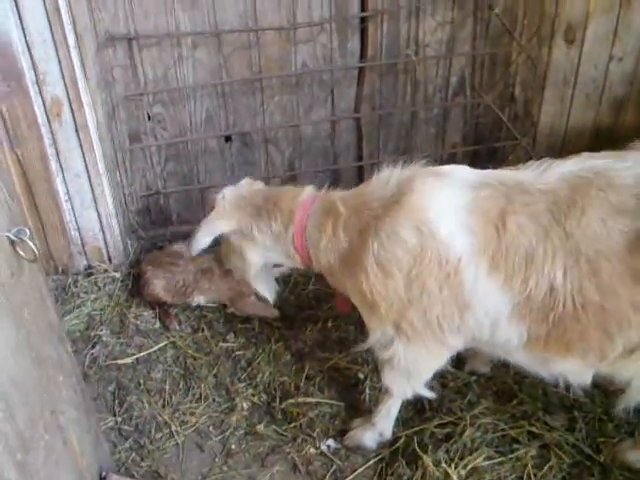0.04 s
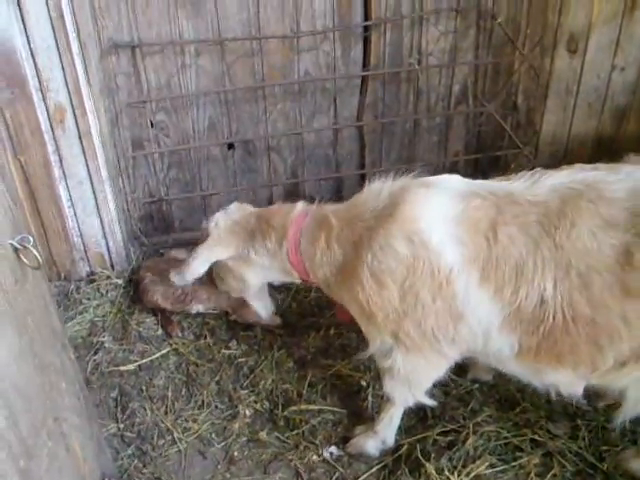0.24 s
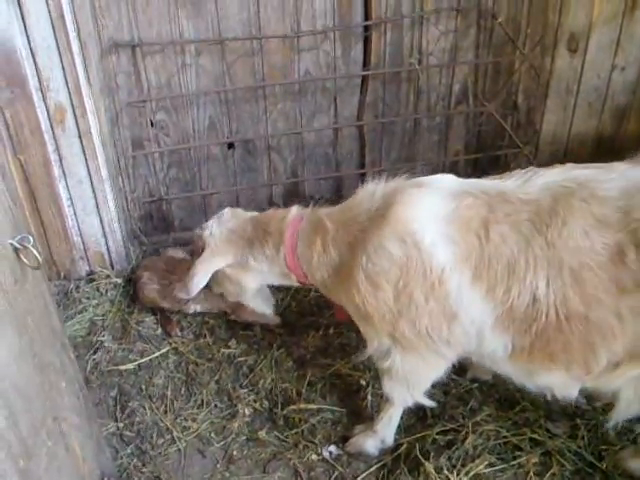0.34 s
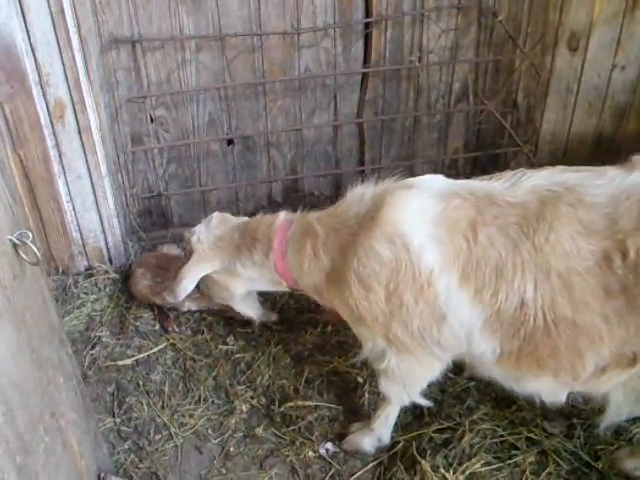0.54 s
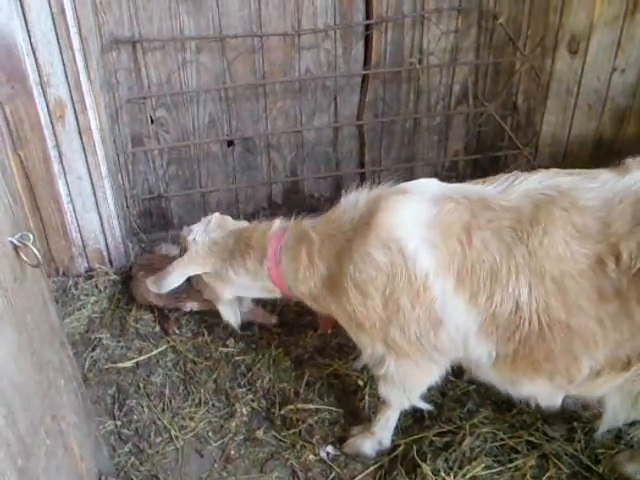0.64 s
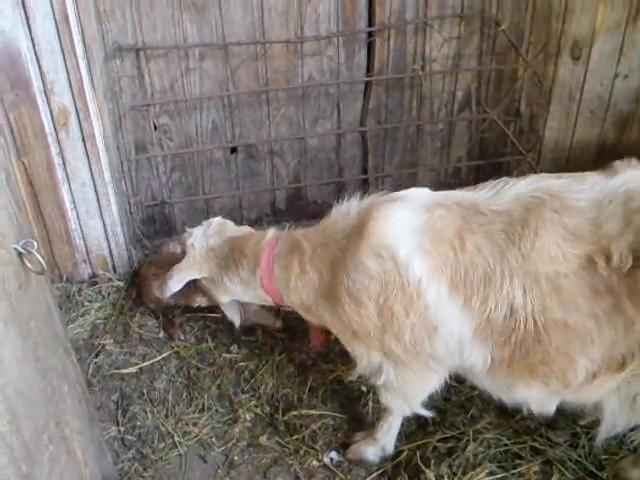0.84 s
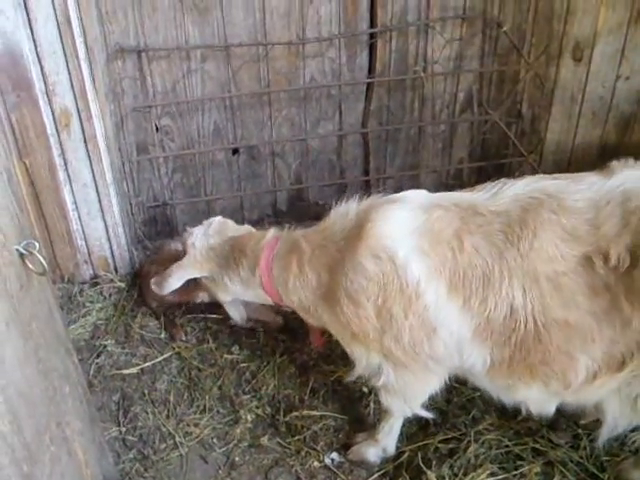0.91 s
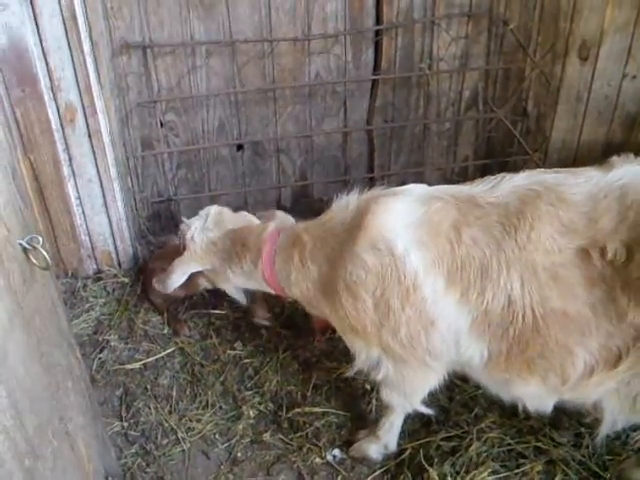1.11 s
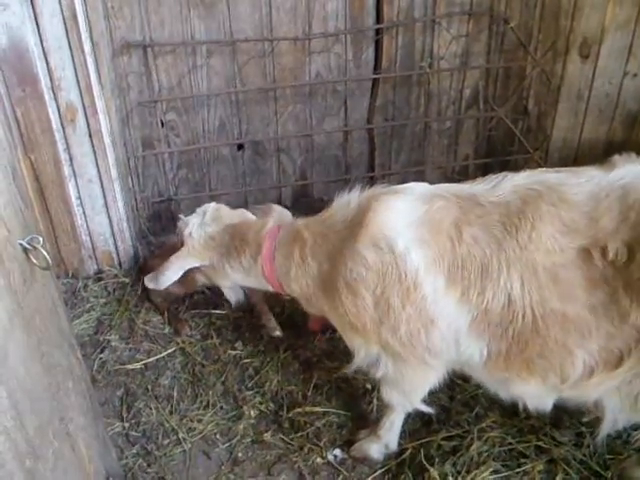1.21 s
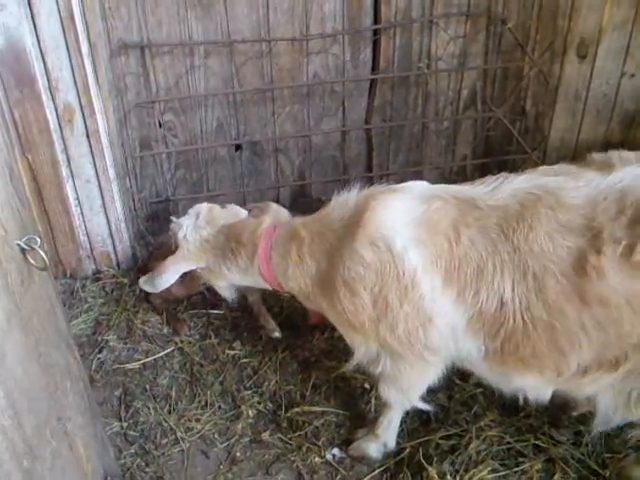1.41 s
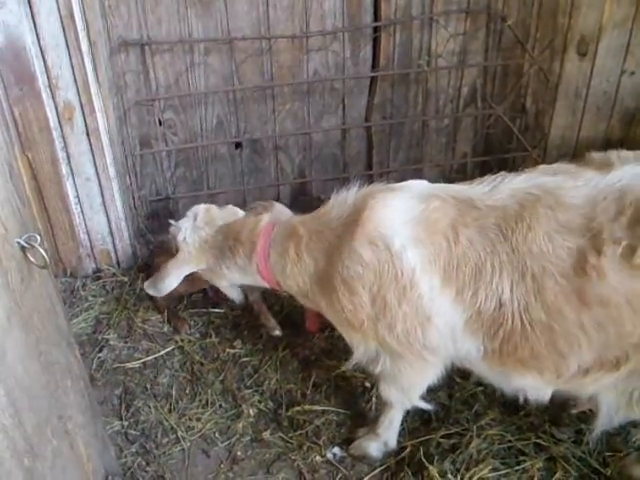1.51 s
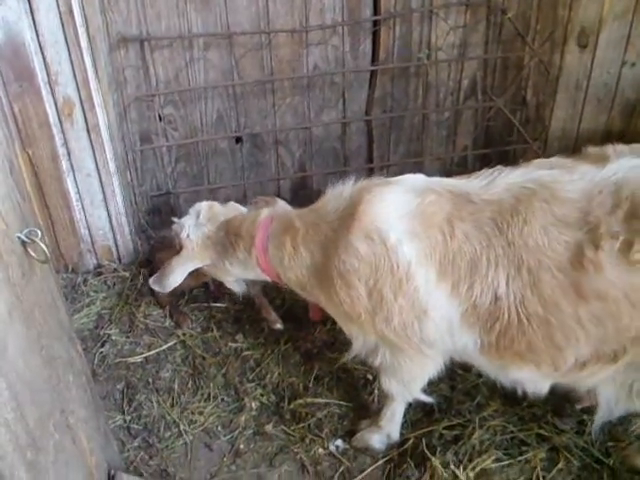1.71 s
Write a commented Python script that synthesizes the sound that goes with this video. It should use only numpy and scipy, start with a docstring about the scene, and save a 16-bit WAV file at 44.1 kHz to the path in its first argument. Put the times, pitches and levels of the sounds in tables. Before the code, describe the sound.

A doe bleats once, loud and raspy-edged, after barely heard low grunts. The boards echo briefly, then soft closed-mouth throbbing grunts follow and a tiny straw snap, over faint low air noise; near, plain microphone.

```python
"""In a wooden barn stall low, throbbing grunts come first, as a doe makes to her kid: slack-fold pulses
ring a throat behind a nearly closed mouth. Then one loud, high goat bleat starts hoarse, holds a clear
note and breaks up as the pitch drops: fold harmonics and pulsed noise, the harmonics through a moving throat.
The boards ring briefly as dense, decaying echoes. More grunts follow, then a straw snaps as a noise burst.
Filtered noise and wavering sines lie underneath throughout as dull air and a faint hum."""
import sys
import numpy as np
from scipy import signal
from scipy.fft import rfft, irfft
from scipy.io import wavfile
from scipy.ndimage import uniform_filter1d

SR = 44100
rng = np.random.default_rng(int(sys.argv[2]) if len(sys.argv) > 2 else 0)


def persist_wave(psi):
    """Save psi, clipped to +-1, as 16-bit WAV."""
    counts = np.round(np.clip(psi, -1, 1) * 32767).astype(np.int16)
    wavfile.write(sys.argv[1], SR, np.atleast_2d(counts).T)


N = 77175  # samples, 1.75 s
T = np.arange(N) / SR  # time, s


def amp(db):
    """Level law: decibels to amplitude ratio."""
    return 10 ** (np.asarray(db) / 20)


def unit(x):
    """Power normalisation: scales to rms 1."""
    return x / np.sqrt(np.mean(x ** 2) + 1e-20)


def read(points, hz):
    """Spectral envelope: level in dB at any frequency, interpolated over log frequency."""
    f, value = np.transpose(points)
    return np.interp(np.log(hz + 1), np.log(f + 1), value)


def follow(table):
    """Control by linear interpolation: each column of a table, sample by sample."""
    s, *columns = np.transpose(table)
    return [np.interp(T, s, c) for c in columns]


def during(table):
    """Gating: open while a control table lasts, with edges smoothed over 200 samples."""
    is_open = (T > table[0][0]) & (T < table[-1][0])
    return uniform_filter1d(1. * is_open, size=200)


def wander(hz):
    """Low-pass random modulation: chance variation up to about the given rate, at rms 1."""
    spectrum = rfft(rng.standard_normal(N))
    lowpass = 1 / (1 + (np.fft.rfftfreq(N, 1 / SR) / hz) ** 4)
    return unit(irfft(spectrum * lowpass, N))


def colour(x, points):
    """Minimum-phase filtering: the given spectrum fixes the causal impulse response."""
    log_gain = np.log(amp(read(points, abs(np.fft.fftfreq(4096, 1 / SR)))))
    min_phase = np.exp(signal.hilbert(log_gain).conj())  # log gain and phase are a Hilbert pair
    taps = np.fft.ifft(min_phase).real[:2048]
    return signal.fftconvolve(x, taps)[:len(x)]


def puffs(turns, decay=0.69, steady=0.13):
    """Glottal noise modulation: air noise jumps up and dies away (decay in cycles) in every fold cycle."""
    opening = steady + np.exp(-(turns % 1) / decay)
    return opening * rng.standard_normal(len(turns))


def add(mix, s, sound):
    """Superposition: adds a sound into the mix from time s."""
    part = mix[max(round(s * SR), 0):][:len(sound)]
    part += sound[:len(part)]


# vibration rate of the folds: time_s, pitch_hz
FOLD_PITCH = [(.14, 378), (.19, 390), (.24, 394), (.268, 403), (.29, 400), (.312, 396), (.34, 406),
              (.385, 406.5), (.465, 409), (.515, 414), (.565, 415), (.59, 419), (.64, 420), (.68, 422.7),
              (.77, 423), (.793, 415), (.815, 409), (.84, 402), (.868, 390), (.89, 335), (.93, 300)]
# rms random deviation of that rate: time_s, jitter_share
FOLD_JITTER = [(.17, .022), (.23, .012), (.26, .004), (.31, .002), (.36, .0007), (.46, .0005),
               (.485, .0028), (.515, .001), (.545, .0022), (.57, .001), (.6, .0025), (.63, .0006),
               (.77, .0006), (.795, .003), (.83, .003), (.86, .008), (.885, .035), (.93, .06)]
# low resonance, bright ring and treble: time_s, low_db, ring_db, treble_db
BAND_LEVELS = [(.14, -62, -56, -64), (.184, -38, -39, -52), (.228, -34, -35, -44), (0.25, -17, -20, -29),
               (0.268, -10, -13, -24), (0.284, -12, -12, -23), (0.294, -24, -16, -27),
               (0.326, -21, -11, -23), (0.338, -11, -16, -26), (0.4, -16, -10, -23), (0.422, -16, -15, -26),
               (0.468, -14, -12, -23), (0.478, -12, -17, -26), (0.512, -11, -12, -24),
               (0.536, -21, -13, -25), (0.568, -14, -15, -26), (0.59, -19, -11, -23),
               (0.604, -12, -11, -22), (0.624, -14, -15, -27), (0.638, -13, -11, -23),
               (0.71, -14, -11, -23), (0.726, -16, -14, -25), (0.752, -11, -10, -22), (0.79, -15, -13, -24),
               (0.834, -14, -12, -24), (0.85, -27, -13, -23), (.872, -24, -20, -33), (.893, -33, -17, -37),
               (.912, -42, -24, -50), (.94, -60, -56, -75)]
# mouth opening, 0 narrow to 1 wide: time_s, opening_share
MOUTH_OPENING = [(.26, 0), (0.311, 0.25), (.36, 0.3), (.46, 0.68), (.52, 0.77), (.66, 1), (.77, 1),
                 (.815, 0.52), (.87, 0)]
# throat response with the mouth narrow, half open and wide: frequency_hz, gain_db
THROAT_NARROW = [(280, -50), (390, -24), (620, -20), (800, 0), (960, 6), (1190, -11), (1600, -25),
                 (2000, -14), (2400, -3), (2800, -17), (3200, -11), (3600, -11), (4000, -1), (4400, -12),
                 (4900, -27), (5900, -31), (6950, -19), (7700, -34), (8200, -45), (8650, -36), (9300, -58),
                 (11900, -47), (12600, -56), (13500, -41), (14500, -65)]
THROAT_HALF = [(407, -18), (814, 0), (1220, -10), (1630, -23), (2035, -14), (2440, -1), (2850, -12),
               (3260, -5), (3660, -7), (4070, -4), (4480, -13), (4900, -13), (5300, -23), (6100, -20),
               (6900, -17), (7730, -22), (8140, -34), (8550, -28), (9200, -58), (10100, -44), (12600, -48),
               (13450, -33), (14400, -60)]
THROAT_WIDE = [(420, -14), (840, 0), (1265, -7.5), (1690, -13), (2110, -10), (2530, -14), (2950, -4),
               (3380, -4), (3800, -4), (4220, -7), (4640, -13), (5060, -21), (5900, -30), (6750, -24),
               (7170, -20), (7600, -21), (8030, -25), (8450, -41), (9300, -52), (12600, -56), (13300, -44),
               (14400, -75)]
# hoarseness of the bleat: time_s, rasp_level_db
RASP_LEVEL = [(.13, -54), (.18, -39), (.215, -32), (.25, -27), (.28, -28), (.32, -36), (.39, -50),
              (.46, -50), (.49, -41), (.56, -44), (.6, -38), (.64, -52), (.77, -52), (.8, -34), (.84, -29),
              (.868, -22), (.895, -20), (.92, -30), (.96, -58)]
# rasp spectrum as the bleat opens and as it closes: frequency_hz, gain_db
RASP_OPENING = [(200, -23.5), (500, -14.5), (800, -16), (1400, -17), (1950, -7.5), (2400, -10.5),
                (2900, -10.5), (3600, -6.5), (4400, -0.5), (5200, -15), (6000, -20), (6800, -7),
                (7800, -24), (9300, -37), (13500, -44), (15000, -50)]
RASP_CLOSING = [(200, -43.5), (500, -26), (720, 9.5), (950, 13), (1200, 4.5), (1400, -11.5), (2000, 1),
                (2400, -22.5), (2700, -10), (3200, -4), (4200, -12.5), (5300, -17.5), (6800, -13),
                (7800, -14), (9300, -29), (13500, -21.5), (15000, -50.5)]
JITTER_HZ = 255.3  # rate limit of the pitch deviation
SWELL_DB, SWELL_HZ = 2.7, 14  # rms swell from the 5th harmonic up, its rate limit
FLUTTER, FLUTTER_HZ = .32, 48  # depth before harmonic and jitter weighting, its rate limit


def bleat(shimmer=5):
    """Source-filter principle: unsteady fold harmonics pass a moving throat; returns tone and pulsed rasp."""
    (pitch,), (mouth,), (rasp_db,), (jitter,) = map(
        follow, (FOLD_PITCH, MOUTH_OPENING, RASP_LEVEL, FOLD_JITTER))
    turns = np.cumsum(pitch * (1 + jitter * wander(JITTER_HZ))) / SR  # fold cycles so far
    k = np.arange(1, 37)[:, None]  # harmonic numbers
    hz = k * pitch

    # throat gain, crossfaded between three mouth shapes
    wide = np.clip(2 * mouth - 1, 0, 1)
    narrow = np.clip(1 - 2 * mouth, 0, 1)
    half = 1 - narrow - wide
    throat_db = narrow * read(THROAT_NARROW, hz) + wide * read(THROAT_WIDE, hz) + half * read(THROAT_HALF, hz)

    # upper harmonics swell slowly, each on its own
    swell_db = SWELL_DB * np.minimum(k / 5, 1) ** 2 * np.array([wander(SWELL_HZ) for _ in k])
    gain = amp(throat_db) * amp(swell_db)

    # faster flutter of amplitude and phase, deeper where the folds are unsteady
    depth = FLUTTER * np.minimum(k / 7, 1) ** 1.5 * np.minimum(np.sqrt(jitter / .001), 1.6)
    flutter = 1 + depth * np.array([wander(FLUTTER_HZ) + 1j * wander(FLUTTER_HZ) for _ in k])
    phase = 2 * np.pi * (k * turns + .55 * rng.random(k.shape))
    partials = gain * (flutter * np.exp(1j * phase)).real
    partials = partials / np.sqrt(1 + 2 * depth ** 2)  # flutter leaves the power unchanged

    # harmonics 1-2, 3-12 and 13-36, each group brought to its own level
    tone = 0
    for band, level_db in zip((slice(0, 2), slice(2, 12), slice(12, None)), follow(BAND_LEVELS)):
        expected_rms = np.sqrt((gain[band] ** 2).sum(0) / 2)
        tone = tone + amp(level_db) * partials[band].sum(0) / expected_rms
    tone = tone * (1 + shimmer * jitter * wander(JITTER_HZ / 2))

    # the rasp spectrum changes mostly near the end
    start_s, end_s = FOLD_PITCH[0][0], FOLD_PITCH[-1][0]
    closing = np.clip((T - start_s) / (end_s - start_s), 0, 1) ** 6
    air = puffs(turns)
    rasp = (1 - closing) * unit(colour(air, RASP_OPENING)) + closing * unit(colour(air, RASP_CLOSING))
    return tone * during(BAND_LEVELS), rasp * amp(rasp_db) * during(RASP_LEVEL)


# grunts: start_s, length_s, pulse_rate_hz, throat_level_db, chest_level_db, hiss_level_db
GRUNT_CALLS = [(.026, 0.033, 111, -41, -53, -61), (0.051, 0.052, 189, -36.5, -33.5, -48),
               (.096, .055, 110, -45.5, -57, -51.5), (1.151, .028, 168.8, -47, -46, -67),
               (1.18, 0.054, 64.1, -45, -58.5, -62), (1.24, .025, 69.6, -48, -52, -69),
               (1.269, 0.026, 147.9, -39.5, -56, -60), (1.282, 0.032, 207, -40.5, -43, -48),
               (1.319, 0.045, 130, -36, -41, -47), (1.341, 0.057, 221.3, -29.5, -29, -41.5),
               (1.432, 0.027, 194.3, -38.5, -44, -53.5), (1.449, 0.046, 215.9, -27.5, -29, -45.5),
               (1.49, 0.024, 198.7, -41, -57, -49.5), (1.553, 0.06, 79.75, -34, -41, -50.5),
               (1.602, 0.021, 78.3, -37, -46.5, -52)]
# throat behind the nearly closed mouth: frequency_hz, gain_db
CLOSED_THROAT = [(100, -44.5), (300, -19.5), (480, -22), (600, 0), (720, 7.5), (790, 4.5), (875, 8),
                 (1060, 6), (1220, -12.5), (1450, -19.5), (1620, -11), (1900, -42), (2400, -16),
                 (3000, -40), (4500, -53), (9000, -78)]
# hiss through the nose: frequency_hz, gain_db
NOSE_HISS = [(300, -21), (1400, 4.5), (2000, 0), (2450, 9.5), (3100, -7.5), (4100, 0), (4700, -2),
             (5500, -24.5), (6800, -5), (7800, -25), (8700, -12.5), (9400, -26.5), (13500, -20),
             (15000, -45)]
GRUNT_RISE_S, GRUNT_FALL_S = 0.026, .012  # times for a full 0-1 ramp
GRUNT_JITTER, GRUNT_PUFF = .02, .25  # pulse-rate scatter share, air mixed with the knocks


def grunt(length, rate_hz, throat_db, chest_db, hiss_db, onset=0.61):
    """Impulse excitation: slack folds knock the throat and a chest tone into ringing, with pulsed hiss."""
    t = np.arange(0, length + .03, 1 / SR)  # room to ring out
    turns = np.cumsum(rate_hz * (1 + GRUNT_JITTER * wander(71)[:len(t)])) / SR
    rise = np.clip(onset + t / GRUNT_RISE_S, 0, 1)  # begins part-way up, at onset
    swell = rise * np.clip((length - t) / GRUNT_FALL_S, 0, 1)
    knocks = unit(np.diff(np.floor(turns), prepend=-1))  # one impulse per cycle
    throat = colour(swell * (knocks + GRUNT_PUFF * unit(puffs(turns))), CLOSED_THROAT)
    chest = colour(swell * knocks, [(60, -27.5), (140, -16.5), (205, -4), (260, -9.5), (400, -38), (900, -58)])
    hiss = colour(swell * puffs(turns), NOSE_HISS)
    voice = amp(throat_db) * unit(throat) + amp(chest_db) * unit(chest) + amp(hiss_db) * unit(hiss)
    return np.sqrt(t[-1] / length) * voice  # levels refer to the length without the ring-out


# reverberation time of the boards: frequency_hz, t60_s
STALL_T60 = [(150, 0.13), (900, 0.3), (2500, 0.3), (5000, 0.18), (9000, 0.23), (14000, 0.073)]
BLEAT_ROOM_DB, RASP_ROOM_DB, GRUNT_ROOM_DB = -14, 0.5, -11  # sends to the stall; grunts and straw share one


def stall(x):
    """Reverberant decay: dense echoes off the boards, each frequency band dying at its own speed."""
    length = SR // 2
    signs = rng.choice([-1., 1.], length)
    echoes = signs * (rng.random(length) < 2500 / SR)  # about 2500 echoes a second
    echoes = echoes * (T[:length] > .003)
    hz, t, z = signal.stft(echoes, SR, nperseg=256)
    decay = amp(-60 * t / read(STALL_T60, hz)[:, None])
    tail = signal.istft(z * decay, SR)[1]
    return signal.fftconvolve(x, tail / np.linalg.norm(tail))[:N]


# the straw's snap: start_s, peak_level_db, decay_s
STRAW_SNAP = (1.681, -28.5, 0.00087)
# its spectrum: frequency_hz, gain_db
STRAW_COLOUR = [(300, -10), (2800, 15), (6000, -2), (8500, -9.5), (11000, -22), (15000, -38.5)]


def straw():
    """Transient fracture: one dry snap as exponentially decaying, coloured noise."""
    s, db, decay = STRAW_SNAP
    envelope = (T > s) * np.exp(-abs(T - s) / decay)
    crack = colour(envelope * rng.standard_normal(N), STRAW_COLOUR)
    return amp(db) * crack / abs(crack).max()


# relative spectrum of the dull air: frequency_hz, gain_db
AIR_COLOUR = [(20, 9), (45, -10), (70, 0), (110, -4), (160, -3), (260, -4), (500, -8.5), (850, -5),
              (1400, -16), (2500, -22), (4000, -25), (6000, -33), (9000, -42.5), (14000, -43)]
# hum lines: frequency_hz, rms_level_db
HUM_LINES = [(146, -51.5), (176, -59), (410, -60)]
AIR_DB = -43.5  # rms
HUM_WAVER = 0.1  # rms waver of amplitude (share) and phase (radians)


def background():
    """Stationary noise plus line spectrum: dull air and a hum wavering in amplitude and phase."""
    hum = np.zeros(N)
    for hz, db in HUM_LINES:
        level = amp(db) * np.sqrt(2) * (1 + HUM_WAVER * wander(6))
        hum += level * np.sin(2 * np.pi * hz * T + HUM_WAVER * wander(6))
    return hum + amp(AIR_DB) * unit(colour(rng.standard_normal(N), AIR_COLOUR))


def scene():
    """Superposition: direct sounds, their reverberation in the stall, and the background."""
    tone, rasp = bleat()
    low = straw()
    for start, *row in GRUNT_CALLS:
        add(low, start, grunt(*row))
    room = stall(amp(BLEAT_ROOM_DB) * tone + amp(RASP_ROOM_DB) * rasp + amp(GRUNT_ROOM_DB) * low)
    return (tone + rasp + low + room + background())[None]


# microphone response with a treble notch: frequency_hz, gain_db
MICROPHONE_RESPONSE = [(20, 0), (10250, 0), (10800, -24), (11400, -24), (11850, 0), (13700, 0),
                       (14300, -14)]
CREST, TROUGH = .97, .93  # amplitude ceilings of positive and negative peaks
EDGE_HZ = 14400  # band limit


def record(dry):
    """Saturation, then linear filtering: rounded peaks, the microphone's notch and the band limit."""
    x = dry[0]
    ceiling = np.where(x > 0, CREST, TROUGH)
    rounded = x / (1 + (x / ceiling) ** 14) ** (1 / 14)
    heard = colour(rounded, MICROPHONE_RESPONSE)
    band_limit = signal.firwin(511, EDGE_HZ, window=("kaiser", 9), fs=SR)
    return signal.oaconvolve(heard, band_limit, "same")[None]


dry = scene()
out = record(dry)
persist_wave(out)
```